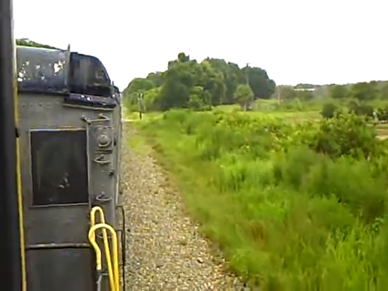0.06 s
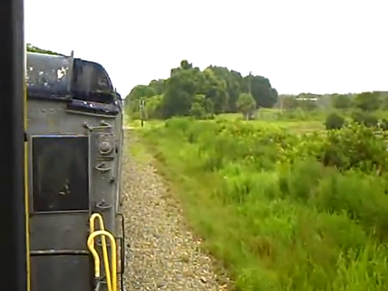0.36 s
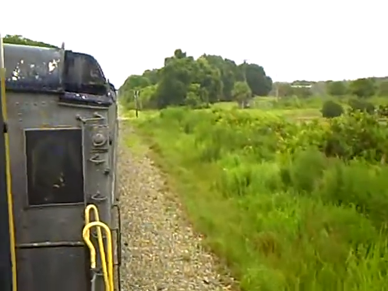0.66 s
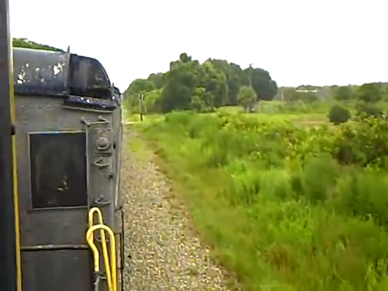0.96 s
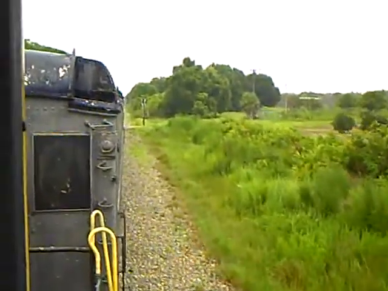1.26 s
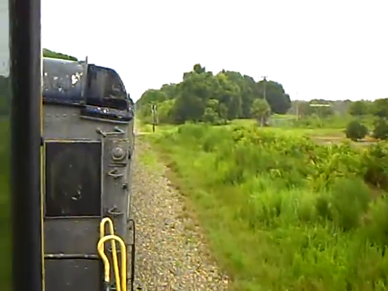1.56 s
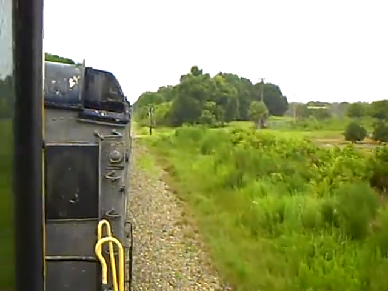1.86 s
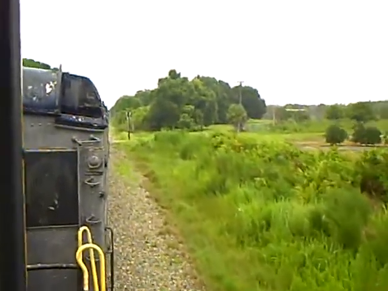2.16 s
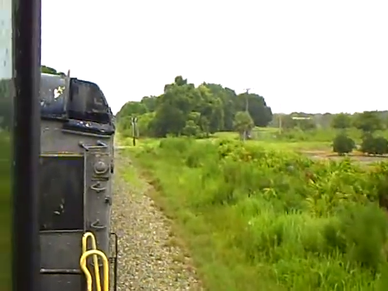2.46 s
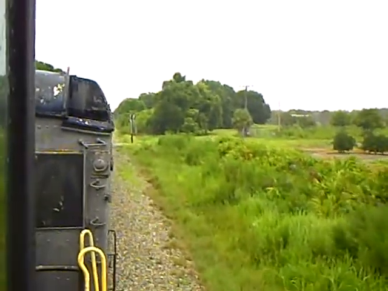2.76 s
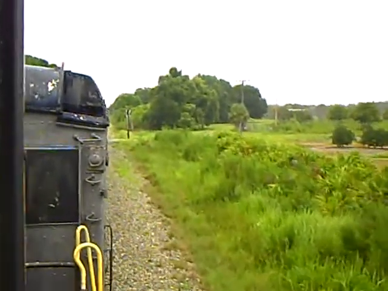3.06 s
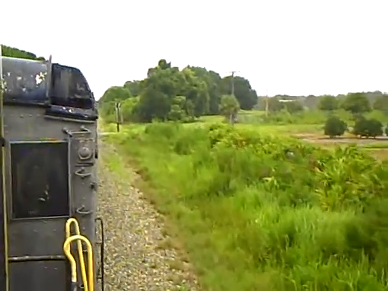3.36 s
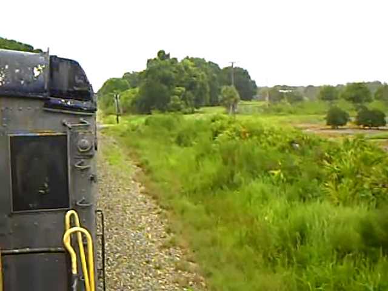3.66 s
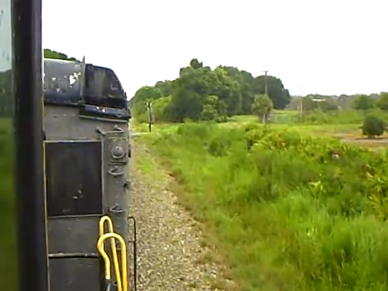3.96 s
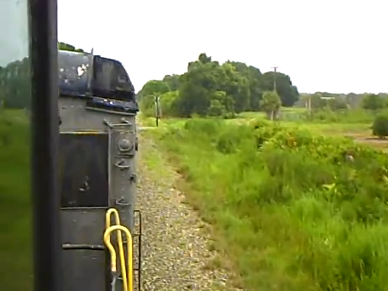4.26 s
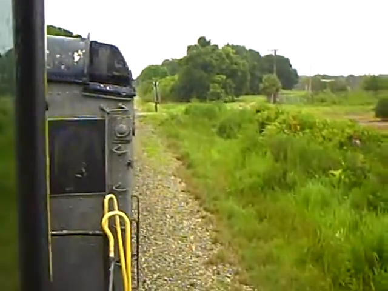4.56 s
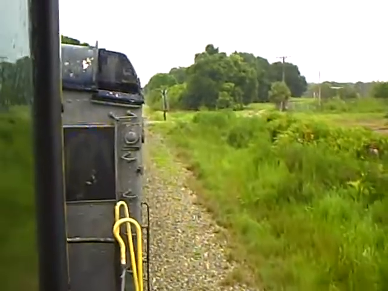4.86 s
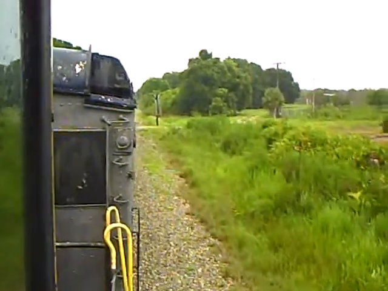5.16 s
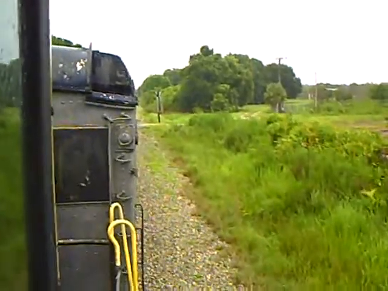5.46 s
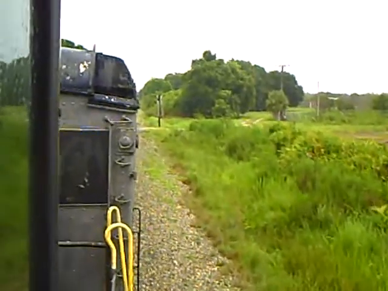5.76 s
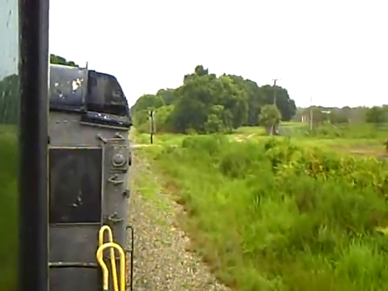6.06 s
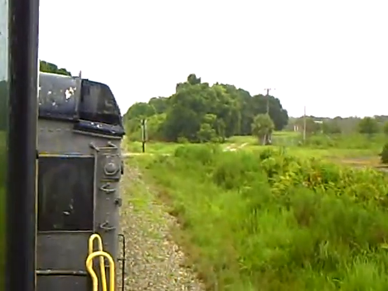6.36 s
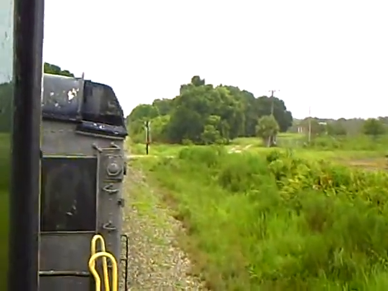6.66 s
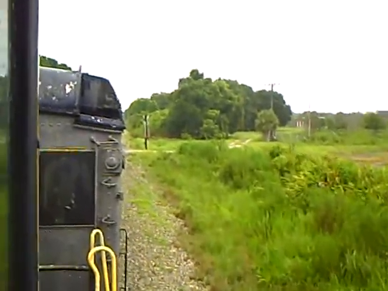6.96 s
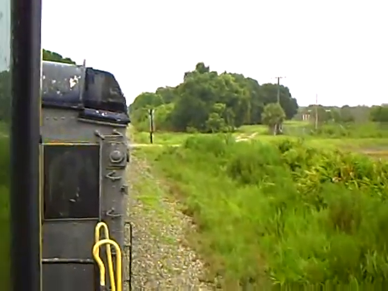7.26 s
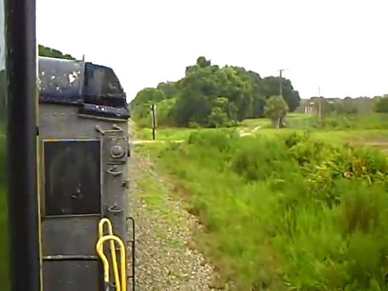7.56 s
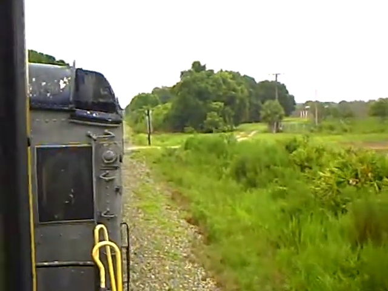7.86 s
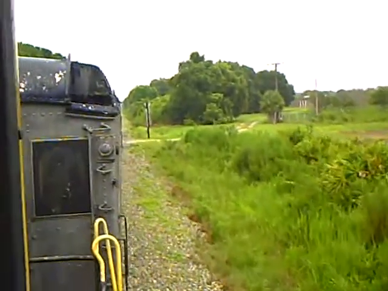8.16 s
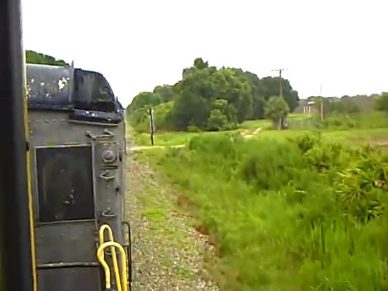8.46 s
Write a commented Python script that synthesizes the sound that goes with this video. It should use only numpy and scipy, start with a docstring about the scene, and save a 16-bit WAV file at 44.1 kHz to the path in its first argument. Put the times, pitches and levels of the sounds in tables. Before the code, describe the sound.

Two diesel locomotives pull a train with a deep, beating drone, heard at the open cab window over machine clatter, gear whine, wheel rumble and rushing air. About two seconds in, a heavy steel clank sounds and compressed air hisses in faint puffs. The engines speed up, grow louder and settle. Loose fittings rattle briefly, and toward the end sheet metal buzzes lightly while a fan spins up.

```python
"""First comes the beating boom of two diesel locomotives pulling a train, heard at the open cab window.
Their exhausts resonate in the cab over machine clatter, gear whine, rolling wheels and rushing air.
Just after two seconds a heavy steel clank sounds and compressed air hisses; the near engine digs in,
and both engines speed up and settle. Fittings rattle; later sheet metal buzzes and a fan spins up."""
import sys
import numpy as np
from scipy.fft import rfft, irfft, next_fast_len
from scipy.io import wavfile
from scipy.ndimage import uniform_filter1d, minimum_filter1d, map_coordinates

SR = 44100
rng = np.random.default_rng(int(sys.argv[2]) if len(sys.argv) > 2 else 0)


def bounce(signal):
    """Save signal as a 16-bit WAV file at the path given by the first command-line argument."""
    frames = np.transpose(np.atleast_2d(signal))
    limited = np.clip(frames, -1, 1)
    pcm = np.round(limited * 32767).astype(np.int16)
    wavfile.write(sys.argv[1], SR, pcm)


N = 383669


def amp(db):
    """Gain of a level in dB."""
    return 10 ** (np.asarray(db) / 20)

def unit(x):
    """x at rms 1."""
    return x / np.sqrt(np.mean(x ** 2) + 1e-20)

def clock():
    """The time of every sample in s."""
    return np.arange(N) / SR

def step(mid_s, width_s):
    """A smooth passage from 0 to 1."""
    return .5 + .5 * np.tanh((clock() - mid_s) / (2 * width_s))

def burst(peak_s, rise_s, t60):
    """An envelope that swells up to peak_s, then falls 60 dB in t60 seconds."""
    t = clock() - peak_s
    return np.where(t < 0, np.exp(-(t / rise_s) ** 2), amp(-60 * np.abs(t) / t60))

def noise():
    """White noise."""
    return rng.standard_normal(N)

def wobble(rate):
    """A smooth random curve, rate knots a second."""
    knots = rng.standard_normal(int(N * rate / SR) + 4)
    return map_coordinates(knots, [np.arange(N) * rate / SR])

def tone(cycles):
    """A sine of rms 1 that follows a running count of cycles."""
    return np.sqrt(2) * np.sin(2 * np.pi * (cycles + rng.random()))

def filtered(x, response):
    """x times a complex response of frequency."""
    size = next_fast_len(N + SR // 2)
    return irfft(rfft(x, size) * response(np.fft.rfftfreq(size, 1 / SR)), size)[:N]

def coloured(x, spectrum):
    """x shaped by (frequency [Hz], level [dB]) points, at rms 1."""
    points_hz, db = np.transpose(spectrum)
    return unit(filtered(x, lambda hz: amp(np.interp(np.log(hz + 1), np.log(points_hz), db))))

def resonances(modes, hz):
    """Summed response of (frequency [Hz], width [Hz], gain [dB]) modes."""
    return sum(amp(db) * 1j * hz * width / (centre ** 2 - hz ** 2 + 1j * hz * width)
               for centre, width, db in modes)

def resonant_noise(modes):
    """Noise ringing through modes, at rms 1."""
    return unit(filtered(noise(), lambda hz: resonances(modes, hz)))


# Wheel rumble from below the cab: (frequency [Hz], relative level [dB])
WHEEL_SPECTRUM = [(10, -20), (20, -21), (32, 2.5), (55, 1), (105, -2), (150, -3), (185, -4), (260, -4),
                  (340, -7), (450, -16.5), (900, -41), (3000, -120)]

def wheels(effort_db, base_db=-31.0, effort_share=.06, lumpy_db=1):
    """Down on the track, wheels rumble on uneven rail, a little more when they pull hard."""
    level_db = base_db + effort_share * effort_db + lumpy_db * wobble(13)
    return amp(level_db) * coloured(noise(), WHEEL_SPECTRUM)


# Bright hiss at the window, also the colour of the rattles: (frequency [Hz], relative level [dB])
AIR_SPECTRUM = [(1500, -34), (3000, -1), (4000, 0.5), (5000, 0.5), (5800, -1), (6500, -8), (7100, -6),
                (8000, -4.5), (9200, -7), (10200, -10), (11200, -21.5)]

def window_air(effort_db, base_db=-47.5, effort_share=.12, flutter_db=0.82, grain_db=1.3, split_hz=6500):
    """Air flutters past the window frame by the microphone, more as the engine draws harder."""
    def eddies():
        return amp(flutter_db * wobble(30) + grain_db * wobble(300))
    rush = coloured(noise(), AIR_SPECTRUM)
    fine = filtered(rush, lambda hz: hz > split_hz)  # the finest eddies come and go by themselves
    return amp(base_db + effort_share * effort_db) * ((rush - fine) * eddies() + fine * eddies())


# Chatters of loose fittings: (time [s], relative level [dB])
FITTING_RATTLES = [(1.1294, -29), (2.4104, -28), (4.6044, -28), (4.6698, -30), (4.8569, -26.5),
                   (5.2794, -30), (7.4394, -30), (8.2631, -29.5), (8.3654, -27)]

def rattles(base_db=-14, rise_s=0.0044, t60=0.096):
    """Loose fittings give short bright chatters."""
    envelope = sum(amp(base_db + db) * burst(s, rise_s, t60) for s, db in FITTING_RATTLES)
    return envelope * coloured(noise(), AIR_SPECTRUM)


# Modes of a loose metal sheet: (frequency [Hz], width [Hz], gain [dB])
SHEET_MODES = [(3120, 460, 1.5), (3390, 120, -5), (8700, 2200, -17)]
# Its bouts of buzzing: (time [s], level [dB], rise [s])
SHEET_BOUTS = [(4.4, -50, .1), (6.9, -46, .3), (7.44, -48, .03), (7.75, -52, .04), (8.3, -44.5, 0.16)]

def sheet_buzz(far_turns, rest_db=-59, t60=1.2, depth=0.25):
    """A loose sheet of metal buzzes in bouts, shaken by the deep beat of the far engine."""
    shaken = resonant_noise(SHEET_MODES) * (1 + depth * tone(2 * far_turns))
    bouts = sum(amp(db) * burst(s, rise_s, t60) for s, db, rise_s in SHEET_BOUTS)
    return (amp(rest_db) + bouts) * unit(shaken)


# Resonances of the air nozzle: (frequency [Hz], width [Hz], gain [dB])
NOZZLE_MODES = [(5050, 540, 2), (8150, 600, -2), (8750, 900, -10)]
# Puffs from it: (time [s], level [dB])
AIR_PUFFS = [(2.17, -50), (2.48, -47), (2.83, -55)]

def compressed_air(rise_s=.05, t60=1.2):
    """Compressed air hisses in a few puffs after the heavy clank."""
    return sum(amp(db) * burst(s, rise_s, t60) for s, db in AIR_PUFFS) * resonant_noise(NOZZLE_MODES)


def cooling_fan(start_s=5.7, rise_s=2.2, start_hz=478, climb_hz_per_s=9, level_db=-43, waver_db=2):
    """The cooling fan spins up: its note fades in and climbs steadily."""
    running_s = np.maximum(clock() - start_s, 0)
    hz = start_hz + climb_hz_per_s * running_s
    fade_in = np.minimum(running_s / rise_s, 1)
    return amp(level_db + waver_db * wobble(14)) * fade_in * tone(np.cumsum(hz) / SR)


def thin_whine(hz=858, swell_s=1.1, stop_t60=.3, peak_db=-46, waver_db=1):
    """A thin note swells and breaks off at the heavy clank."""
    clank_s = STEEL_CLANKS[-1][0]
    return amp(peak_db + waver_db * wobble(8)) * burst(clank_s, swell_s, stop_t60) * tone(hz * clock())


# Gear notes of the near and far engine: (multiple of shaft speed, relative level [dB])
NEAR_TEETH = [(45, -50), (63, -54.5), (80, -46.5), (84, -51), (96, -54), (100, -51.5)]
FAR_TEETH = [(63, -45), (108.7, -42), (138, -53.5), (158, -58), (198.5, -52)]

def gear_whine(near_turns, far_turns, far_start_db=-13.5, far_db_per_s=1.6, waver_db=1.5, drift=0.075):
    """Meshing teeth sing in both engines, the far one ever louder as it takes up the load."""
    def mesh(turns, teeth):
        return sum(amp(db + waver_db * wobble(10)) * tone(multiple * turns + drift * wobble(14))
                   for multiple, db in teeth)
    far_gain = amp(far_start_db + far_db_per_s * clock())
    return mesh(near_turns, NEAR_TEETH) + far_gain * mesh(far_turns, FAR_TEETH)


# Steel grinding on steel: (frequency [Hz], relative level [dB])
SCRAPE_SPECTRUM = [(150, -21), (400, 3.5), (1000, 1.5), (1600, -2.5), (2400, -4), (4000, -17),
                   (6500, -22.5), (9500, -20.5), (11200, -34)]
# Lesser modes of the steel: (frequency [Hz], width [Hz], gain [dB])
STEEL_MODES = [(338, 20, -3), (522, 26, -16), (1106, 12, -10), (1540, 84, -14), (3300, 90, -12),
               (4050, 43, -17)]
# A light clank, then the heavy one:
# (time [s], scrape level [dB], rise [s], scrape t60 [s], ring [Hz], ring level [dB], ring t60 [s])
STEEL_CLANKS = [(.53, -32, 0.021, 0.29, 994, -33, .2), (2.139, -23, 0.015, 0.19, 864, -21.5, 0.11)]

def clanks(modes_db=-5):
    """Heavy steel parts grind together, and one strong mode rings briefly."""
    modes = amp(modes_db) * resonant_noise(STEEL_MODES)
    scrape = coloured(noise(), SCRAPE_SPECTRUM) + modes
    sound = np.zeros(N)
    for s, scrape_db, rise_s, scrape_t60, ring_hz, ring_db, ring_t60 in STEEL_CLANKS:
        sound += amp(scrape_db) * burst(s, rise_s, scrape_t60) * scrape
        sound += amp(ring_db) * burst(s, rise_s, ring_t60) * tone(ring_hz * clock())
    return sound


# Crankshafts: (starting speed [turns/s], gain in the run-up [turns/s], change on settling [turns/s])
NEAR_SHAFT, FAR_SHAFT = (10.93, 2.24, -.38), (9.8, .86, .185)
RUN_UP, SETTLE = (2.6, .29), (5.25, .65)  # (midpoint [s], time constant [s])

def shaft_turns(speeds, hunt):
    """Turns made by a crankshaft that runs up and settles, while its governor hunts a little."""
    slow, gained, settling = speeds
    speed = slow + gained * step(*RUN_UP) + settling * step(*SETTLE)
    return np.cumsum(speed * (1 + hunt * wobble(5))) / SR


# Spells of hard pulling: (start [s], attack [s], hold [s], release [s], added effort [dB])
NEAR_HARD_PULLS = [(2.1, 0.21, 0.21, 0.63, 9.5), (2.1, 0.14, 1.9, 2.1, 4.5)]
FAR_HARD_PULLS = [(3.0, 0.53, 0.83, 1, 7.5), (6.3, .3, 0.13, .5, 4.5)]

def effort(pulls, easy_db, load_db=2):
    """How hard an engine works, in dB: the run-up adds lasting load, and each pull comes and goes."""
    pulling = sum(db * np.interp(clock(), np.cumsum([s, attack, hold, release]), [0, 1, 1, 0])
                  for s, attack, hold, release, db in pulls)
    return easy_db + load_db * step(*RUN_UP) + pulling


def clatter(turns, points=4096):
    """Valves, injectors and gears make the same dense pattern of knocks on every turn."""
    pattern = rng.standard_normal(points)
    return unit(map_coordinates(pattern, [turns % 1 * points], mode="grid-wrap"))


# Hood and cab panels around the microphone: (frequency [Hz], width [Hz], gain [dB])
PANEL_MODES = [(504, 19, -13), (566, 10, -6.5), (615, 11, -14), (675, 14, -2.5), (704.5, 10, -5),
               (828, 8, -4), (862, 7.8, -20), (912, 17, -12), (978, 15, -16), (1060, 13, -15),
               (1124, 6, -7.5), (1174, 12, -18), (1237, 16, -21), (1310, 12, -10), (1513, 28, -9),
               (1610, 18, -18), (1742, 19, -5), (1864, 21, -6.5), (1930, 20, -8), (2023, 22, -6),
               (2126, 23, -6.5), (2173, 21, -12), (2340, 19, -9), (2450, 22, -24)]
# Machine noise at the window: (frequency [Hz], relative level [dB])
MACHINE_SPECTRUM = [(120, -35), (250, -3.5), (420, 0.5), (680, 0), (760, 0), (1100, 0.7), (1520, -2),
                    (1820, -8), (2200, -4), (2600, -10.5), (2950, -15.5), (3450, -12.5), (3750, -21),
                    (7000, -36.5)]

def machinery(near_turns, far_turns, effort_db, base_db=-30.5, effort_share=0.089,
              near_db=-3, far_db=-5, cylinders=12, puff=0.12, flutter_db=0.16, panel_db=1):
    """Clatter and a roar of gas that puffs with the firings grow with effort and set the panels ringing."""
    roar = noise() * (1 + puff * tone(cylinders * near_turns))
    drive = roar + amp(near_db) * clatter(near_turns) + amp(far_db) * clatter(far_turns)
    ringing = filtered(drive, lambda hz: 1 + amp(panel_db) * resonances(PANEL_MODES, hz))
    level_db = base_db + effort_share * effort_db + flutter_db * wobble(22)
    return amp(level_db) * coloured(ringing, MACHINE_SPECTRUM)


def firing_notes(turns, orders, effort_db, uneven_db):
    """Cylinders fire notes on multiples of the shaft speed; the main ones grow with effort."""
    return sum(amp(db + share * effort_db + uneven_db * wobble(6)) * tone(multiple * turns)
               for multiple, db, share in orders)


# Each engine's notes: (multiple of shaft speed, level before the cab [dB], gain with effort [dB/dB])
NEAR_NOTES = [(3, -44.5, 0.75), (4, -42, -0.1), (6, -35, 1), (7, -40.5, 0), (8, -43, -0.3),
              (9, -41.5, 0.96), (10, -44.5, 0.5), (12, -44.5, 1), (14, -44.5, -0.2), (16, -47.5, 0.24),
              (18, -52, 0.55), (20, -49.5, 0.16), (21, -49, 0.74), (25, -51, 0.1), (30, -50.5, 0.28)]
FAR_NOTES = [(3, -47.5, .1), (4, -40, .1), (5, -41, .1), (6, -33, 0.88), (9, -40, .1), (10, -43, .1),
             (11, -48, 0.091), (12, -42, 0.088), (14, -46.5, .1), (15, -47, .1), (24, -49.5, 0.081),
             (30, -52, .1)]
# Air resonances of the near exhaust stack and of the cab: (frequency [Hz], width [Hz], gain [dB])
STACK_MODES = [(33.8, 7.2, -8), (109.3, 12, 1), (142, 17, 6), (243, 38, -12.5)]
CAB_MODES = [(33.7, 4, -2), (67.8, 11.5, 0), (114.4, 6.3, 2.5), (144.2, 8.4, -0.5), (206, 7.5, 4.5)]

def exhausts(near_turns, far_turns, near_effort, far_effort,
             chuff_db=-43, chuff_share=0.77, throb_db=-42, run_up_gain_db=9):
    """Both exhausts boom in the cab; the near stack chuffs under load, the far engine throbs once run up."""
    notes = firing_notes(near_turns, NEAR_NOTES, near_effort, uneven_db=1.5)
    notes += firing_notes(far_turns, FAR_NOTES, far_effort, uneven_db=1.7)
    boom = filtered(notes, lambda hz: 1 + resonances(CAB_MODES, hz))
    throb = amp(throb_db + run_up_gain_db * step(*RUN_UP)) * tone(2 * far_turns)
    chuff = amp(chuff_db + chuff_share * near_effort) * resonant_noise(STACK_MODES)
    return boom + throb + chuff


def scene(gather_db_per_s=0.0919):
    """One microphone at the open cab window, one engine close by and the other farther off."""
    near_turns = shaft_turns(NEAR_SHAFT, hunt=0.001192)
    far_turns = shaft_turns(FAR_SHAFT, hunt=0.00098)
    near_effort = effort(NEAR_HARD_PULLS, easy_db=-4.5)
    far_effort = effort(FAR_HARD_PULLS, easy_db=-5)
    engines = exhausts(near_turns, far_turns, near_effort, far_effort)
    whines = gear_whine(near_turns, far_turns) + thin_whine() + cooling_fan()
    roar = machinery(near_turns, far_turns, near_effort + far_effort)
    roar += wheels(near_effort) + window_air(near_effort)
    roar *= amp(gather_db_per_s * clock())  # louder as the train gathers way
    events = clanks() + compressed_air() + rattles() + sheet_buzz(far_turns)
    return (engines + whines + roar + events)[None]


def record(dry, ceiling=0.31, top_hz=11150):
    """A limiter after the microphone holds down the peaks; nothing passes above top_hz."""
    needed_gain = np.minimum(1, ceiling / (np.abs(dry[0]) + 1e-9))
    held_gain = minimum_filter1d(needed_gain, size=881)  # 20 ms
    smooth_gain = uniform_filter1d(held_gain, size=441)  # 10 ms
    return filtered(dry[0] * smooth_gain, lambda hz: hz < top_hz)[None]


dry = scene()
out = record(dry)
bounce(out)
```